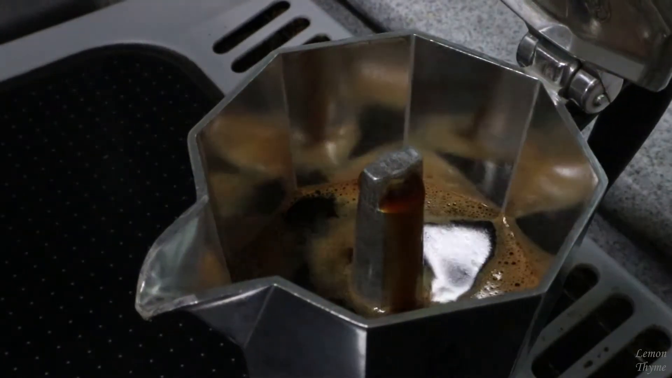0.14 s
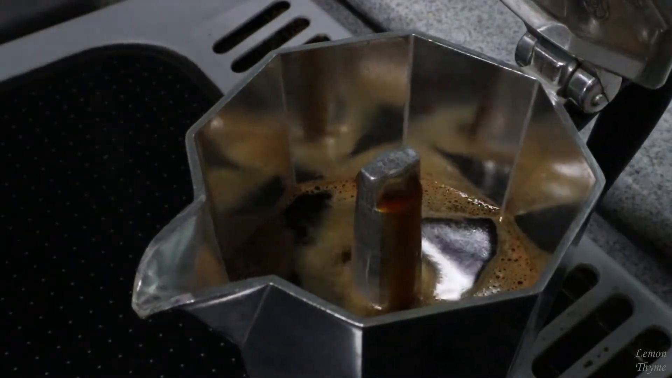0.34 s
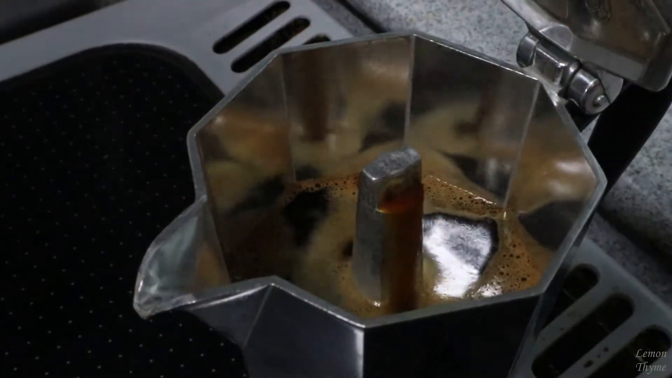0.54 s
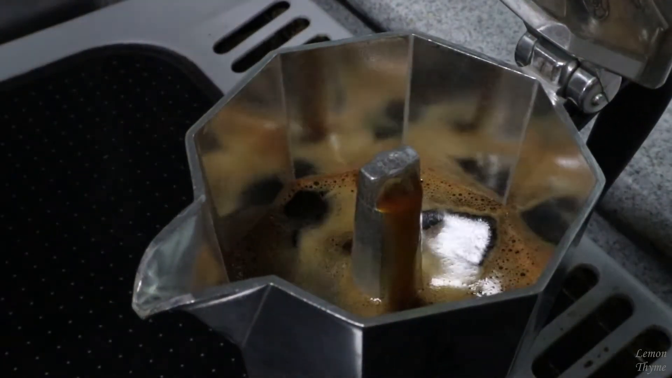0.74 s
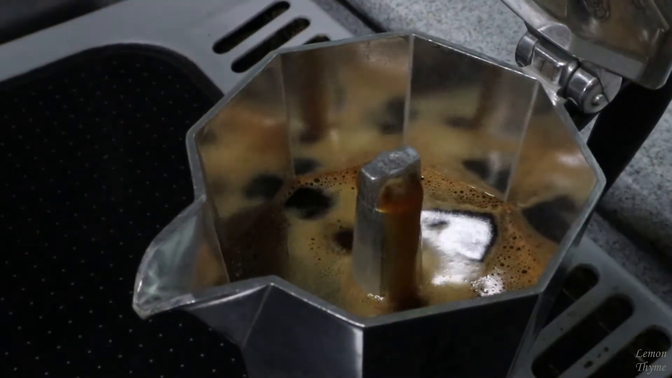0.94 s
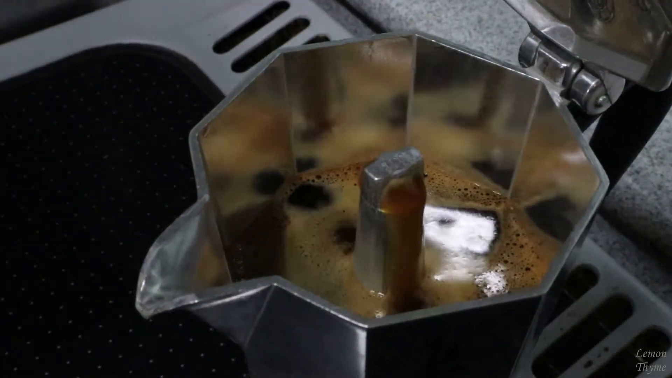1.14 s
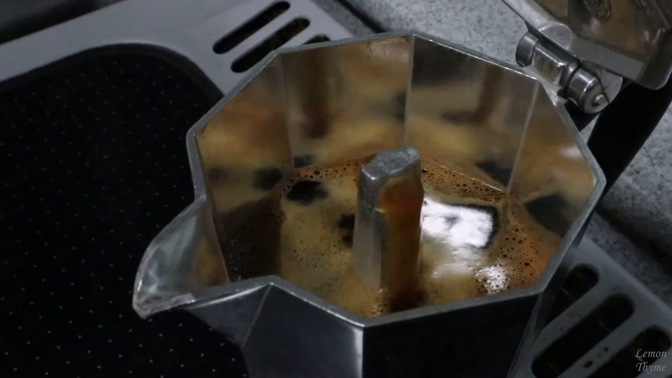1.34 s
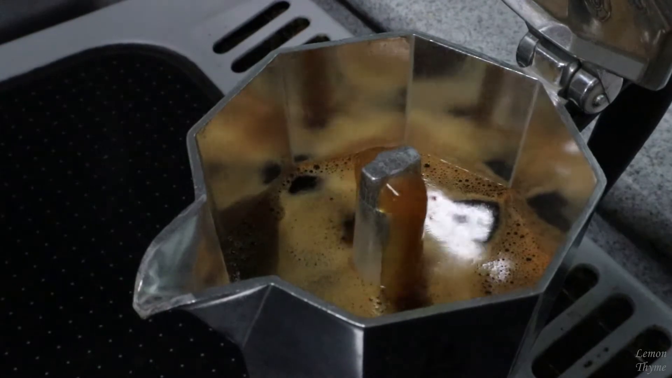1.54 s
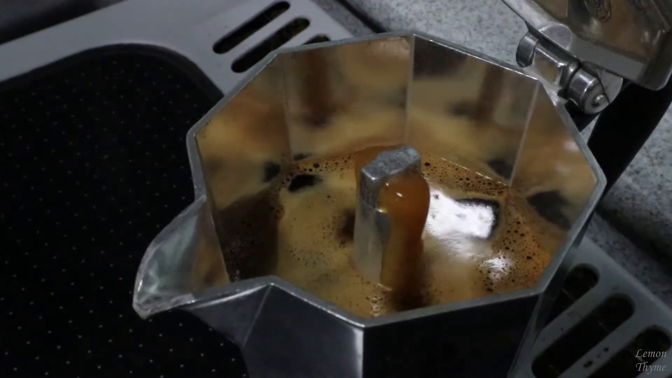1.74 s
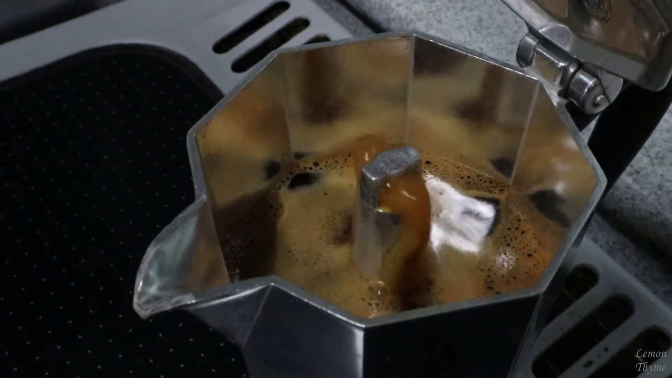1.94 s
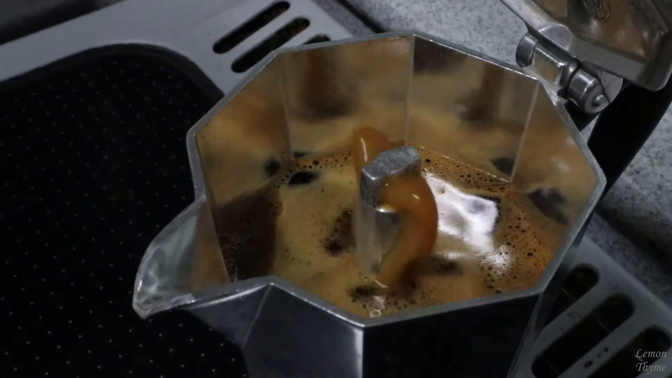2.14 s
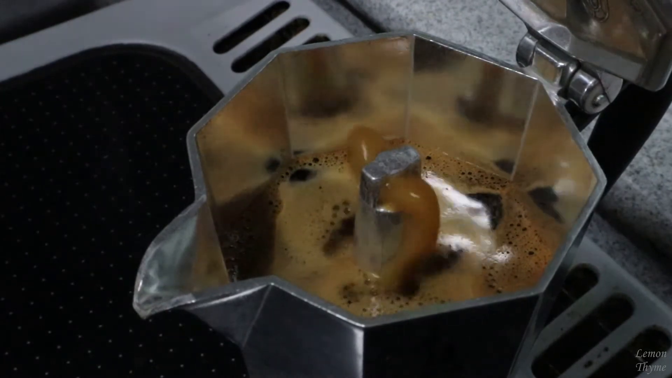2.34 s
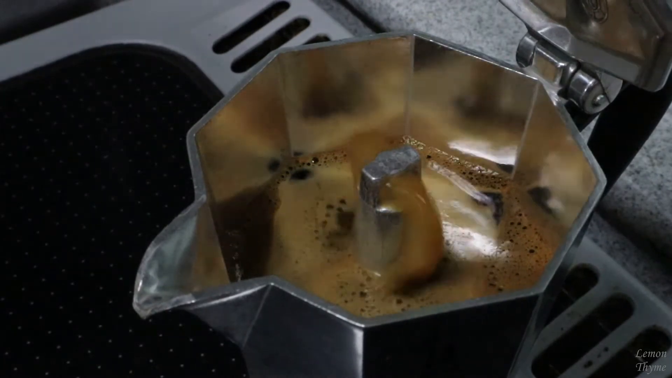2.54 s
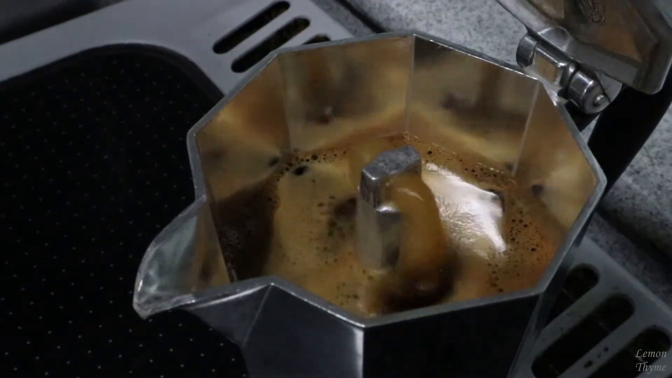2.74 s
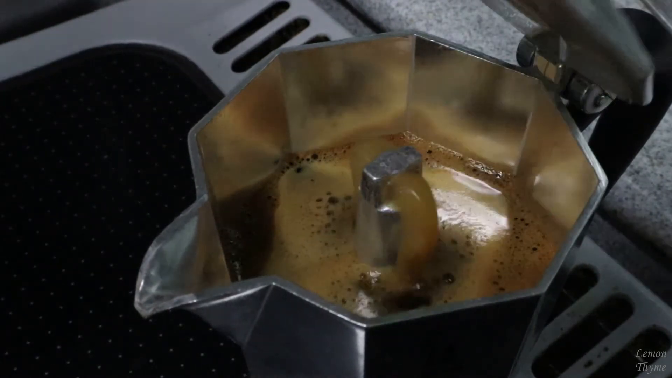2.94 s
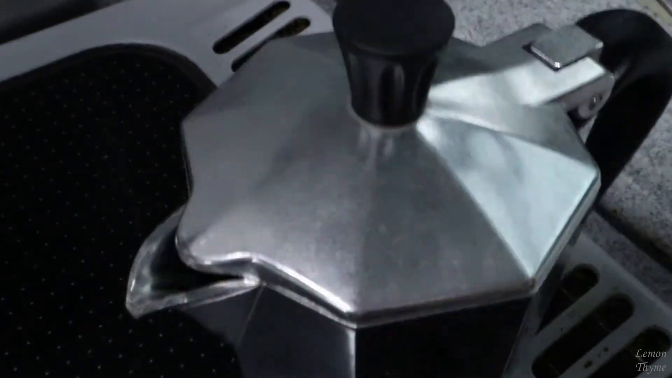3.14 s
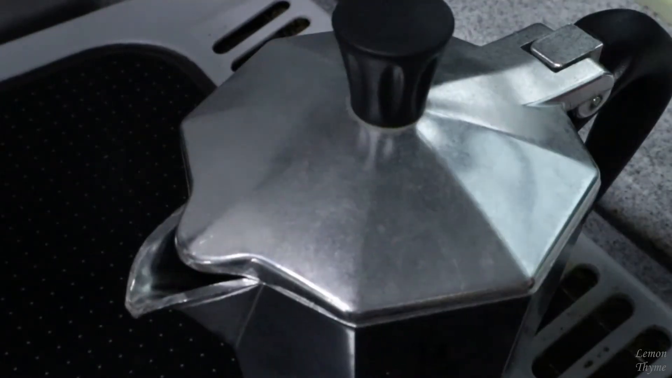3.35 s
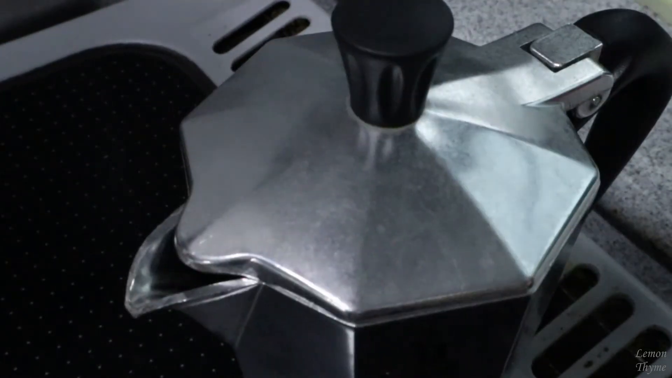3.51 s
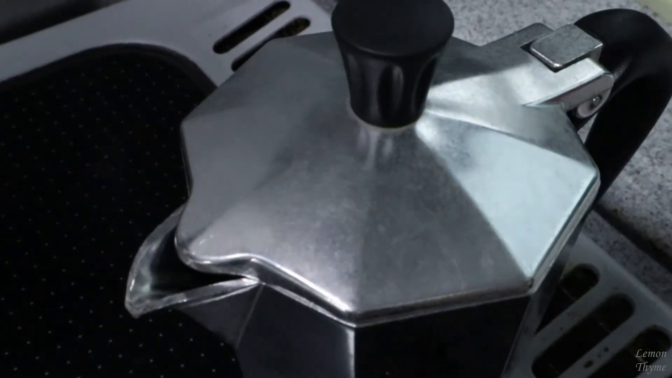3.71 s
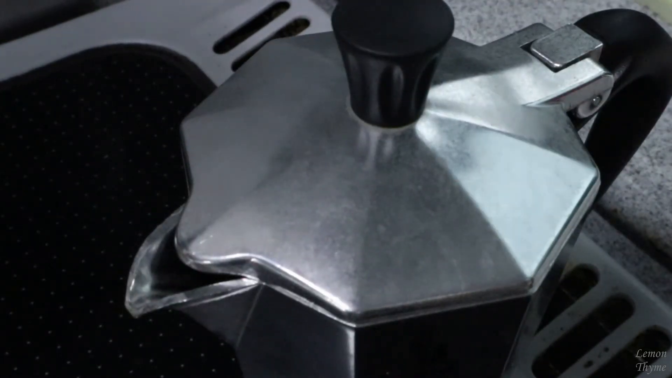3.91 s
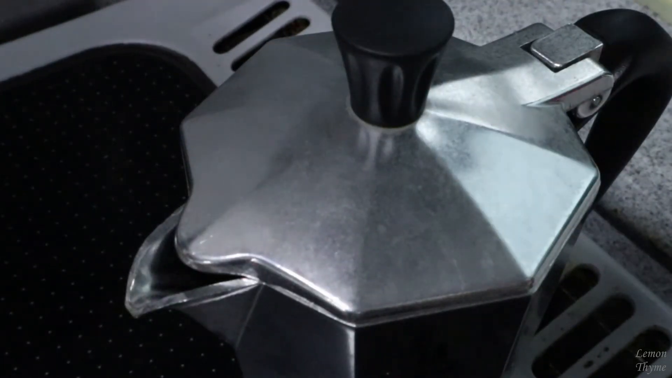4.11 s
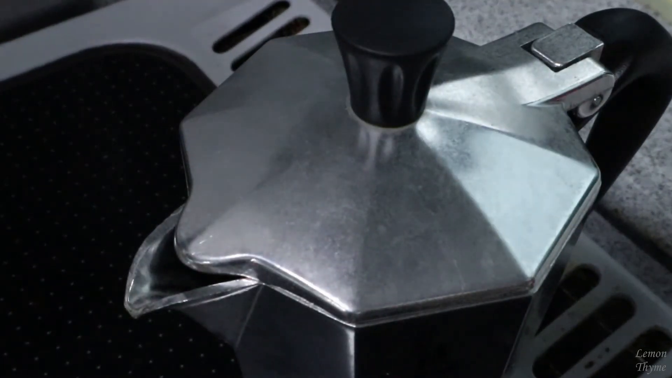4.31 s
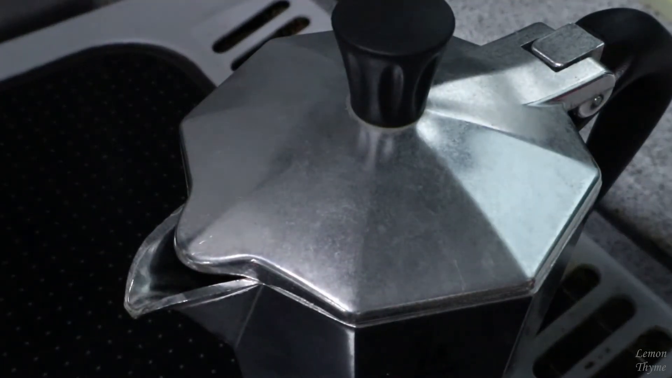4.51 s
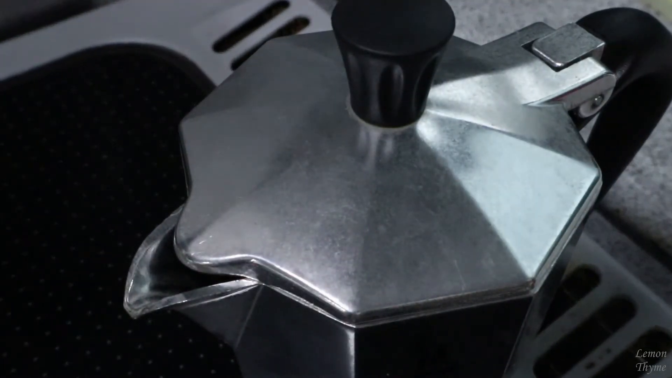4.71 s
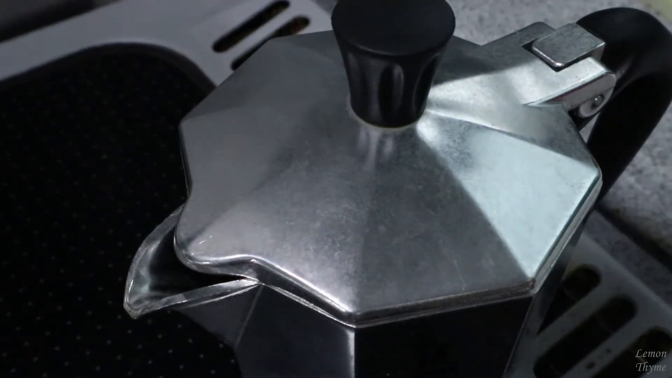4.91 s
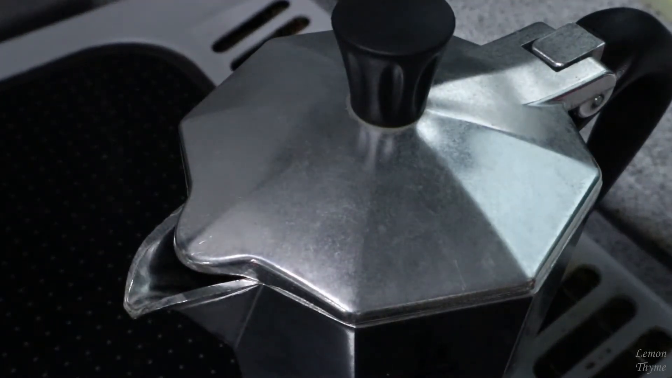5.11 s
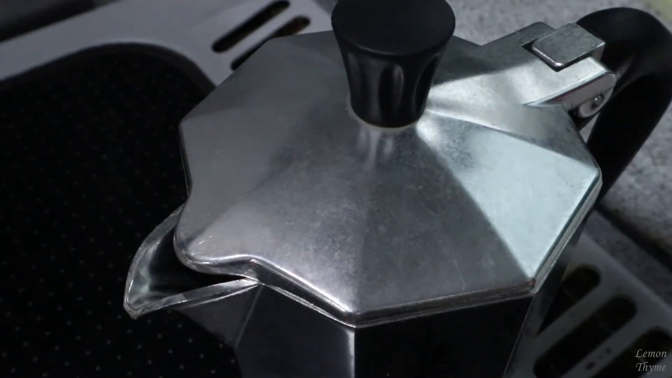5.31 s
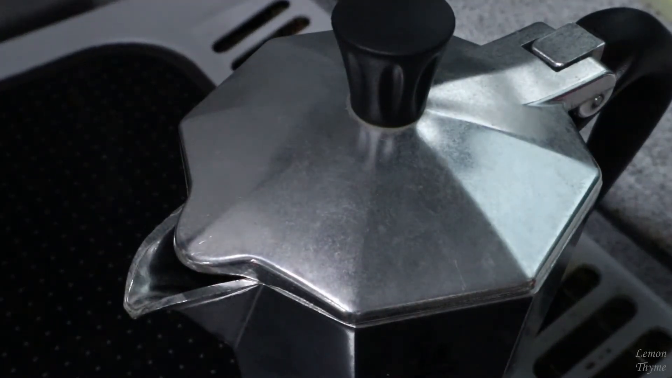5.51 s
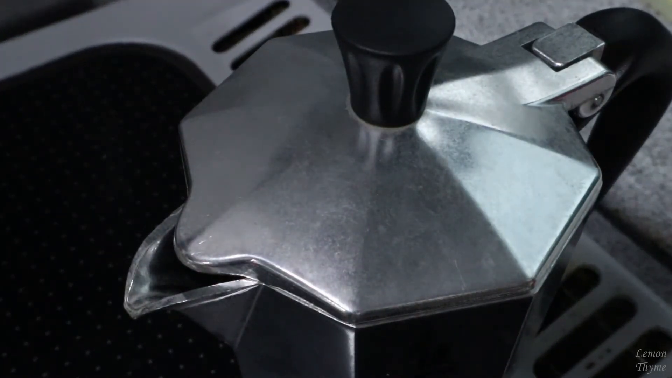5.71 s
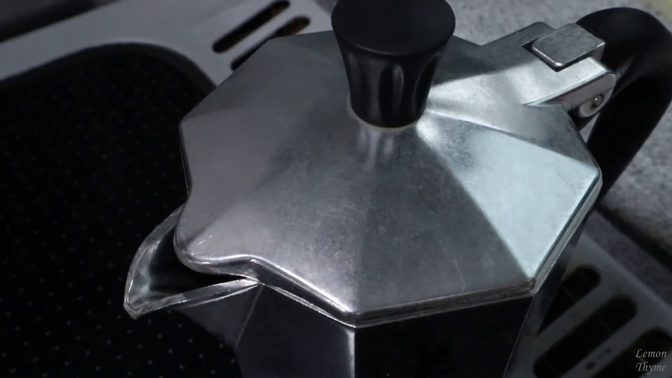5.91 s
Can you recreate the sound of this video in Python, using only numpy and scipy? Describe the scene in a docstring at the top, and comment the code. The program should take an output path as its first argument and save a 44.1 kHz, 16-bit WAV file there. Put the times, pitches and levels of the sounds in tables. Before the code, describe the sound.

A metal stovetop coffee pot is on the boil in a kitchen, heard from close by in stereo. For the first three seconds it simmers open: a soft, steady bubbling with a fine hiss, a few single low bubbles, tiny spits and a faint tick of hot metal right at the start. At about 3.1 seconds the lid drops shut with a sharp, bright clack, bouncing very briefly on the rim. This is the loudest sound, and it leaves a low shudder in the stove that dies away within a second. The boil is quiet at first under the lid, then swells from about 4 seconds into a spluttering gurgle with irregular hollow glugs, over a low rumble. Steam hisses and rings faintly in the metal walls, most around 5 seconds. The gurgling is strongest at the end, near 6 seconds.

```python
"""A metal stovetop coffee pot on the boil in a kitchen, heard from close by on a stereo microphone.
It simmers open at first: a bubbling roar, single bubbles and spits, a fine hiss ringing in the metal.
Just after 3 s the sound cuts from the open pot to a second scene, which fades in.
There the lid drops shut, bounces on the rim and shakes the stove. Then the boil swells to a gurgle
as slugs of steam burst under the lid, and steam sings in the walls."""
import sys
import numpy as np
from scipy import signal
from scipy.fft import rfft, irfft, next_fast_len
from scipy.io import wavfile
from scipy.ndimage import uniform_filter1d, map_coordinates

SR = 44100
rng = np.random.default_rng(int(sys.argv[2]) if len(sys.argv) > 2 else 0)


def int16_out(signal):
    """Quantize to a 16-bit WAV file."""
    q = np.round(np.clip(np.atleast_2d(signal).T, -1, 1) * 32767)
    wavfile.write(sys.argv[1], SR, q.astype(np.int16))


N = 267334
T = np.arange(N) / SR
CUT_S = 3.045  # from the open pot to the second scene


def amp(db):
    """Gain of a level in dB."""
    return 10 ** (np.asarray(db) / 20)


def unit(x):
    """Scaled to rms 1."""
    return x / np.sqrt(np.mean(x ** 2) + 1e-20)


def along(points, hz):
    """Read (f/Hz, value) points on a log frequency axis."""
    f, v = np.transpose(points)
    return np.interp(np.log(hz + 1), np.log(f + 1), v)


def curve(points):
    """Read (t/s, value) points at every sample."""
    return np.interp(T, *np.transpose(points))


def wobble(rate):
    """A smooth random curve, rate knots a second."""
    return map_coordinates(rng.standard_normal(int(N * rate / SR) + 4), [T * rate])


def pops(rate, db):
    """Bubbles collapsing: level kicks of up to db at random moments, rate a second."""
    return (rng.random(N) < rate / SR) * db * rng.uniform(0.59, 1, N)


def filtered(x, response):
    """x times a response of frequency."""
    m = next_fast_len(x.shape[-1] + 8192)
    return irfft(rfft(x, m) * response(np.fft.rfftfreq(m, 1 / SR)), m)[..., :x.shape[-1]]


def lifted(spectrum, modes, hz):
    """Gain of a spectrum raised at its resonances."""
    return amp(along(spectrum, hz) + sum(db / (1 + (2 * (hz - c) / w) ** 2) for c, w, db in modes))


SIDES = np.array([[.5], [-.5]])  # half of a left-right difference goes to each side
def placed(pair, pan, lead):
    """Level and phase differences between the microphone's two capsules."""
    return filtered(pair, lambda hz: (amp(along(pan, hz)) * np.exp(1j * along(lead, hz))) ** SIDES)


def rush(colour, image, lumps_db, patchy_db):
    """Coloured stereo noise of rms 1, stirred in time by lumps_db and in patches of time and pitch."""
    alike, pan, lead = image
    spectra = signal.stft(amp(lumps_db) * rng.standard_normal((2, N)), nperseg=512)[2]
    patches = uniform_filter1d(rng.standard_normal(spectra.shape[1:]), size=4, axis=0)
    patches = unit(uniform_filter1d(patches, size=5, axis=1))
    pair = signal.istft(spectra * amp(patchy_db * patches), nperseg=512)[1][:, :N]
    spread = lambda hz: np.arccos(np.clip(along(alike, hz), 0, 1)) / 2
    mid, side = filtered(pair, lambda hz: colour(hz) * [np.cos(spread(hz)), np.sin(spread(hz))])
    return unit(placed(np.array([mid + side, mid - side]), pan, lead))


def add(track, s, sound):
    """Mix a short sound into the track at time s."""
    part = track[..., round(s * SR):round(s * SR) + sound.shape[-1]]
    part += sound[..., :part.shape[-1]]


def ring(hz, t60, rise, length=.25):
    """A damped sine with a soft start."""
    t = np.arange(int(length * SR)) / SR
    return np.sin(2 * np.pi * hz * t) * amp(-60 * t / t60) * (1 - np.exp(-t / rise))


# Spectra of the open pot from close by: f/Hz, relative level/dB
OPEN_ROAR = [(15, -47), (25, -15), (59, -18.5), (75, -15), (128, 0), (166, -10), (339, -3), (484, -4.5),
             (588, -3.5), (692, -3), (813, -17.5), (972, -13.5), (1200, -26), (1560, -40), (2640, -120)]
OPEN_HISS = [(470, -26), (800, -1.5), (977, -3.5), (1150, -7.5), (1400, 2.5), (1550, -1), (2070, -3.5),
             (2790, -11.5), (4330, -19.5), (4730, -17.5), (6300, -18.5), (7600, -10.5), (9520, -18.5),
             (15900, -24.5)]
DRONE = [(40, -30), (65, -1), (90, 18.5), (110, -21), (140, -34)]
# Resonances of the open pot: f/Hz, width/Hz, lift/dB
OPEN_MODES = [(591, 14, 6), (1380, 280, 1), (2090, 42, 6), (3313, 67, 9.5), (3430, 29, 10), (6700, 92, 0),
              (7000, 150, 3), (7690, 550, 8), (8160, 110, -11), (8770, 240, 4.5), (13700, 260, 4),
              (15100, 580, 12)]
# The drone comes and goes: t/s, level/dB
DRONE_LEVEL = [(0, -72.5), (1.2, -71), (1.4, -79), (1.7, -68.5), (2.3, -86), (3.04, -79)]
# The open pot at the microphone: f/Hz, then likeness of the sides, left minus right/dB or left lead/rad
OPEN_ALIKE = [(60, 0.93), (700, 0.99), (1500, 0.85), (2600, 0.53), (3300, 0.33), (4000, 0.11), (5000, 0.56),
              (7600, 0.84), (10000, 0.47), (14500, .7)]
OPEN_PAN = [(60, 0.5), (500, -1), (1900, -1.8), (3300, 1), (6900, -0.5), (7600, -6.5), (8700, -0.5),
            (10000, -2.5), (14000, 0)]
OPEN_LEAD = [(60, 0.13), (700, 0.095), (1900, 0.23), (2600, 0.65), (3300, 0.4), (5000, -.2), (7600, 0.1),
             (14000, -.2)]
OPEN_IMAGE = OPEN_ALIKE, OPEN_PAN, OPEN_LEAD
def simmer(roar_db=-56, hiss_db=-63.5):
    """The open pot: a bubbling roar and a low drone below, a fine hiss ringing in the metal above."""
    def layer(spectrum, **stir):
        return rush(lambda hz: lifted(spectrum, OPEN_MODES, hz), OPEN_IMAGE, **stir)
    roar = layer(OPEN_ROAR, lumps_db=0.87 * wobble(120), patchy_db=1.0)
    fizz_db = 0.37 * wobble(9.4) + 0.94 * wobble(250) + pops(12, db=14)
    hiss = layer(OPEN_HISS, lumps_db=fizz_db, patchy_db=1.2)
    drone = layer(DRONE, lumps_db=0, patchy_db=1.5)
    pot = amp(roar_db) * roar + amp(hiss_db) * hiss + amp(curve(DRONE_LEVEL)) * drone
    return pot * (T < CUT_S)


# Big bubbles: t/s, level/dB, f/Hz
BIG_BUBBLES = [(0.305, -39, 140), (0.895, -37.5, 335), (1.5, -43, 189), (2.479, -41.5, 136)]
# Spits: t/s, level/dB, band centre f/Hz
SPITS = [(0.1185, -58, 5500), (0.414, -66, 5500), (0.845, -67, 14000), (0.875, -69, 5700),
         (0.995, -67, 5500), (1.145, -70, 13500), (1.345, -70, 12500), (1.4468, -59, 10000),
         (1.5675, -67, 13500), (2.849, -66, 6000), (2.918, -66, 6000), (2.991, -62, 10000),
         (4.4578, -66, 8500), (4.9894, -66, 14000), (5.2435, -63, 10000)]
# A tick of hot metal and one bright bubble bursting: t/s, then modes of f/Hz, level/dB, t60/s
METAL_TICK = .1195, [(1970, -53, .066), (3370, -57, .06), (3800, -67, .05), (5630, -63, .04)]
BRIGHT_POP = 4.806, [(1180, -57, .05), (1580, -57, 0.061), (2010, -61, 0.051)]
def bubbles_and_ticks(spit_t60=.02):
    """Single bubbles, spits and a tick of hot metal stand out of the boil, just left of centre."""
    out, t = np.zeros(N), np.arange(SR // 20) / SR
    for s, db, hz in BIG_BUBBLES:
        add(out, s, amp(db) * ring(hz, t60=.14, rise=0.015))
    for s, db, hz in SPITS:
        band = lambda f: 1 / (1 + (2.2 * np.log((f + 1) / hz)) ** 4)
        spray = unit(filtered(rng.standard_normal(len(t)), band))
        add(out, s, amp(db - 60 * t / spit_t60) * spray)
    for s, modes in (METAL_TICK, BRIGHT_POP):
        add(out, s, sum(amp(db) * ring(hz, t60, rise=0.00035) for hz, db, t60 in modes))
    return out * amp(1.2 * SIDES)


def treble_swell(length_s=.25, peak_db=-72.5, centre_hz=11000):
    """A soft, flickering treble hiss grows just before the cut."""
    band = lambda hz: 1 / (1 + (3 * np.log((hz + 1) / centre_hz)) ** 4)
    hiss = rush(band, OPEN_IMAGE, lumps_db=2.2 * wobble(29.8), patchy_db=5.0)
    fade_in = np.clip(1 - (CUT_S - T) / length_s, 0, 1)
    return amp(peak_db) * hiss * fade_in * (T < CUT_S)


# Strength of the boil under the lid: t/s, strength (0 calm to 1 full)
BOIL_STRENGTH = [(3.3, 0.021), (3.75, 0.086), (4.1, 0.34), (4.5, .6), (5, 0.87), (5.3, 0.9), (5.6, .87),
                 (5.85, 0.97), (6.06, 1)]
def boil_gain(calm_db, full_db, bend):
    """A layer's gain follows the strength of the boil; a bend under 1 rises early."""
    return amp(calm_db + (full_db - calm_db) * curve(BOIL_STRENGTH) ** bend)


# Spectra of the shut pot and the stove from close by: f/Hz, relative level/dB
GURGLE = [(76, -29), (130, -6.5), (162, -4.5), (276, -6.5), (415, -2.5), (461, -4.5), (560, -4.5),
          (730, -43), (1230, -120)]
SPLUTTER = [(330, -36), (560, -2), (596, -7.5), (692, -0.5), (1070, -16), (1530, -17.5), (1650, -33),
            (2200, -31.5), (2860, -59), (4840, -120)]
STEAM = [(700, -23), (1100, -14), (1700, -13), (2500, -17.5), (3400, -15), (4300, -14.5), (4950, -40),
         (5800, -19.5), (6770, -22), (8500, -15.5), (10300, -11.5), (13000, -17.5), (15900, -29)]
RUMBLE = [(15, -6), (38, -7.5), (65, 2), (90, -3), (119, 2), (161, -9), (220, -11.5), (300, -39)]
# Resonances of the air under the lid and of the shut pot's metal: f/Hz, width/Hz, lift/dB
CHAMBER_MODES = [(284.7, 33, 9), (409, 54, 5), (670, 22, 6)]
SHUT_MODES = [(3080, 50, 9.5), (3350, 160, 9.5), (4430, 210, 10.5), (6000, 96, 18), (7350, 140, 13.5),
              (8210, 80, 3), (8900, 160, 10.5), (10240, 260, 2.5), (11360, 160, 7), (12600, 140, 6),
              (14800, 130, -1)]
# Singing modes of the walls: f/Hz, width/Hz, relative level/dB
WALL_MODES = [(410, 70, -11), (667, 44, -7.5), (1527, 74, 0), (1734, 47, -10), (3312, 104, -12.5),
              (4360, 120, -15), (5950, 45, -6.5), (7350, 140, -14.5), (10230, 310, -13), (12500, 180, -14)]
# The walls sing loudest around 5 s: t/s, level/dB
SINGING_LEVEL = [(3.3, -74), (3.75, -74.5), (4.8, -67.5), (5.5, -66.5), (5.8, -72)]
# The boil fades in after the cut: t/s, gain/dB
FADE_IN = [(3.045, -10), (3.11, -9), (3.25, -7), (3.36, 0)]
# The shut pot at the microphone: f/Hz, then likeness of the sides, left minus right/dB or left lead/rad
SHUT_ALIKE = [(60, 1), (240, 0.96), (400, 0.89), (520, 0.51), (900, 0.87), (1530, 0.88), (2500, 0.43),
              (3300, 0.82), (5000, 0.34), (6000, 0.8), (6900, .25), (7600, .42), (10000, 0.28), (14500, .1)]
SHUT_PAN = [(60, 0.1), (370, 0.5), (520, 7), (700, 1), (950, 1), (1300, 0), (1530, -3.5), (1900, -1),
            (8700, -0.5), (11000, -6), (14500, 0)]
SHUT_LEAD = [(60, -1.46), (240, 0.48), (400, -0.08), (500, 1.5), (560, 2), (600, -0.5), (950, 0.3),
             (1530, 0.2), (6000, -0.4), (6900, -1.5), (7600, 0), (8700, -2.5), (10500, -0.8), (14500, -2)]
SHUT_IMAGE = SHUT_ALIKE, SHUT_PAN, SHUT_LEAD
def boil():
    """The shut pot: slugs of steam burst in the column, hiss rings in lid and walls, the stove rumbles."""
    def layer(spectrum, modes, lumps_db, patchy_db):
        return rush(lambda hz: lifted(spectrum, modes, hz), SHUT_IMAGE, lumps_db, patchy_db)
    slugs, kicks = wobble(28), pops(90, db=27)
    gurgle = layer(GURGLE, CHAMBER_MODES, 0.79 * slugs + 1.1 * wobble(150) + kicks, patchy_db=1.1)
    splutter = layer(SPLUTTER, CHAMBER_MODES, 0.95 * slugs + 1.1 * wobble(200) + kicks, patchy_db=2.4)
    puffs_db = 0.62 * slugs + 1.1 * wobble(9.2) + 0.75 * wobble(250)
    steam = layer(STEAM, SHUT_MODES, puffs_db, patchy_db=1.1)
    rumble = layer(RUMBLE, [], 0.41 * wobble(10), patchy_db=0.7)
    walls = lambda hz: sum(amp(db) / (1 + (2 * (hz - c) / w) ** 2) for c, w, db in WALL_MODES)
    singing = rush(walls, SHUT_IMAGE, lumps_db=0, patchy_db=2.0)
    pot = (gurgle * boil_gain(calm_db=-72, full_db=-47, bend=1.14)
           + splutter * boil_gain(calm_db=-87, full_db=-51, bend=0.87)
           + steam * boil_gain(calm_db=-79, full_db=-65, bend=0.52)
           + rumble * boil_gain(calm_db=-64, full_db=-51.5, bend=0.6)
           + singing * amp(curve(SINGING_LEVEL)))
    return pot * amp(curve(FADE_IN)) * (T >= CUT_S)


# The lid strikes the rim: t/s, rattle level/dB, left minus right/dB
CONTACTS = [(3.1275, -21, -3), (3.1337, -29, 1), (3.140, -28.5, 2), (3.146, -25.5, 2), (3.160, -29.5, -14),
            (3.1763, -23, 2.5), (3.188, -29.5, -1), (3.199, -40, 2), (3.209, -38, -1), (3.217, -42, -2)]
# Spectrum of the rattle: f/Hz, relative level/dB
RATTLE = [(60, -23), (140, -1), (230, -13), (300, -7), (450, -10), (700, -8), (1100, -12.5), (1700, -14),
          (2500, -9.5), (4000, -12.5), (8000, -10.5), (9500, -15.5), (12500, -7), (14000, -18), (15800, -4)]
# Resonances of the lid: f/Hz, width/Hz, lift/dB
LID_MODES = [(430, 60, 4), (670, 80, 5), (1900, 150, 4), (2790, 120, 3), (4800, 100, 2), (5810, 80, 5),
             (6620, 80, 3), (7550, 90, 4), (7900, 130, 6), (11300, 100, 3), (12400, 140, 7),
             (12660, 120, 6), (13210, 90, 10), (14340, 90, 7), (15170, 200, 4)]
LID_DROP_S = CONTACTS[0][0]
def lid_rattle(seated_s=3.155, loose_t60=0.063, seated_t60=0.014, room_db=-7.5):
    """Each contact rattles the lid, more briefly once the rim holds it; metal and room ring on."""
    blows, t = np.zeros((2, N)), np.arange(SR // 5) / SR
    for s, db, pan_db in CONTACTS:
        t60 = loose_t60 if s < seated_s else seated_t60
        noise = rng.standard_normal(len(t)) + 0.74 * rng.standard_normal((2, len(t)))
        add(blows, s, amp(db + pan_db * SIDES - 60 * t / t60) * noise)
    cepstrum = irfft(np.log(lifted(RATTLE, LID_MODES, np.fft.rfftfreq(8192, 1 / SR))))
    cepstrum[1:4096] *= 2  # folded to minimum phase: the lid rings only after the blow
    cepstrum[4097:] = 0
    body = irfft(np.exp(rfft(cepstrum)))
    metal = signal.fftconvolve(blows, body[None] / np.linalg.norm(body), axes=1)[:, :N]
    return metal + amp(room_db) * kitchen(metal)[:, :N]


def lid_chime(hz=15168, level_db=-25, free_s=.022, drop_db=16, t60=.17):
    """One high mode of the lid, left of centre, rings freely until the rim touches and damps it."""
    t = T - LID_DROP_S
    held_s = np.maximum(t - free_s, 0)
    loss_db = drop_db * np.minimum(held_s / .008, 1) + 60 * held_s / t60
    envelope = amp(level_db - loss_db + 1.4 * wobble(150)) * np.clip(t / .002, 0, 1)
    return envelope * amp(4.4 * SIDES) * np.sin(2 * np.pi * hz * T + np.array([[0], [.8]]))


# Modes of the stove top, some in close pairs that beat: t/s, level/dB, f/Hz, t60/s, rise/s
STOVE_MODES = [(3.125, -36.5, 36.2, 1.4, .03), (3.125, -37.5, 37.7, 1.4, .03), (3.142, -45, 67.5, 2.5, .05),
               (3.142, -46, 69.3, 2.5, .05), (3.13, -42, 54.3, .6, .02), (3.13, -47, 79, .7, .02),
               (3.128, -51, 137, .8, .01)]
def stove_shudder(swing_db=-24, swing_hz=1.55, swing_t60=1.5, swing_rise_s=.014):
    """The lid's blow shakes the stove top and pushes a slow swing of air at the left capsule."""
    out, t = np.zeros((2, N)), np.arange(SR + SR // 2) / SR
    for s, db, hz, t60, rise in STOVE_MODES:
        pair = [ring(hz * detune, t60, rise, length=1) for detune in (1.002, .998)]
        add(out, s, amp(db + SIDES) * pair)
    onset = 1 - np.exp(-(t / swing_rise_s) ** 2 / 2)
    swing = amp(swing_db - 60 * t / swing_t60) * np.cos(2 * np.pi * swing_hz * t) * onset
    add(out[0], LID_DROP_S, swing)
    return out


# Decay of the kitchen around the pot: f/Hz, t60/s
KITCHEN_DECAY = [(200, 0.67), (1000, 0.25), (5000, 0.24), (15000, 0.22)]
def kitchen(x, delay_samples=200):
    """The room answers a moment later, each frequency dying at its own speed."""
    hz, t, spectra = signal.stft(rng.standard_normal((2, SR // 2)), SR, nperseg=256)
    decay = amp(-60 * t / along(KITCHEN_DECAY, hz)[:, None])
    tail = signal.istft(spectra * decay, SR, nperseg=256)[1]
    delayed = np.pad(x, ((0, 0), (delay_samples, 0)))
    return signal.fftconvolve(delayed, tail / np.linalg.norm(tail[0]), axes=1)


# Bursts under the lid: t/s, low tone level/dB, low tone f/Hz, high tone level/dB
GLUGS = [(4.205, -46.5, 409, -50), (4.296, -63, 328, -52), (4.37, -49, 412, -52),
         (4.496, -49.5, 318, -47.5), (4.541, -43, 400, -50), (4.607, -42.5, 423, -45),
         (4.719, -44.5, 409, -50), (4.763, -52, 388, -46), (4.82, -46, 377, -49), (4.878, -44, 393, -48),
         (4.902, -43, 428, -46), (4.995, -39, 425, -44), (5.052, -42, 364, -44), (5.09, -47, 340, -55),
         (5.117, -43, 274, -46), (5.196, -39, 416, -42), (5.254, -43, 409, -43), (5.314, -47, 304, -35),
         (5.398, -45, 268, -46), (5.431, -41, 398, -41), (5.518, -50, 454, -46), (5.559, -45, 361, -42),
         (5.669, -35, 378, -45), (5.76, -39, 374, -49), (5.864, -38, 285, -46), (5.883, -33.5, 275, -46),
         (5.926, -35, 366, -46), (5.971, -40, 277, -44), (6.019, -41, 261, -40)]
def glugs(high_hz=678, pitch_spread=0.038):
    """The loudest bursts of the gurgle ring the air under the lid at a low and a high tone."""
    out = np.zeros(N)
    for s, low_db, low_hz, high_db in GLUGS:
        low = ring(low_hz, t60=0.056, rise=0.00085)
        high = ring(high_hz * (1 + pitch_spread * rng.standard_normal()), t60=0.028, rise=0.0011)
        add(out, s, amp(low_db) * low + amp(high_db) * high)
    return placed(out, SHUT_PAN, SHUT_LEAD)


def scene():
    """Pot, lid and stove as they reach the close stereo microphone."""
    water = simmer() + boil() + glugs() + bubbles_and_ticks()
    return water + lid_rattle() + lid_chime() + stove_shudder() + treble_swell()


def record(dry):
    """The recorder keeps nothing above its band limit."""
    top_hz, edge_hz = 15830, 120
    return filtered(dry, lambda hz: np.clip((top_hz - hz) / edge_hz, 0, 1) ** 2)


dry = scene()
out = record(dry)
int16_out(out)
```